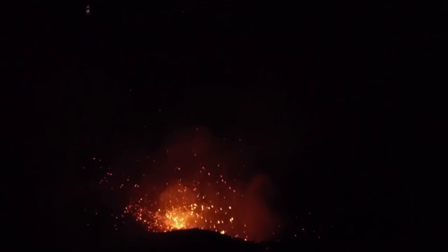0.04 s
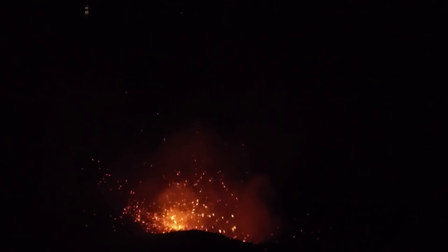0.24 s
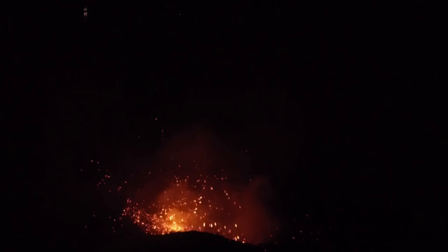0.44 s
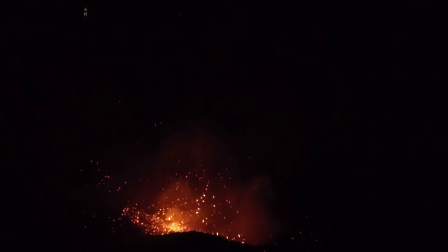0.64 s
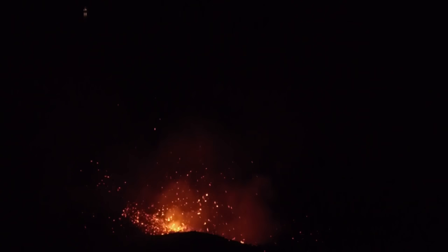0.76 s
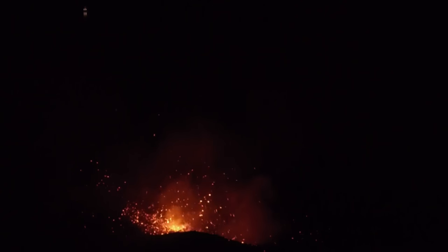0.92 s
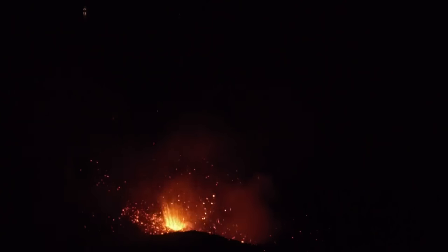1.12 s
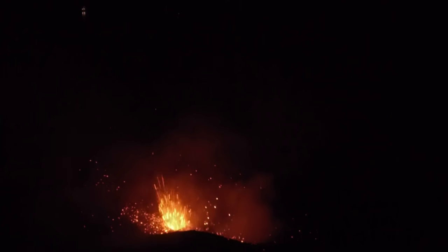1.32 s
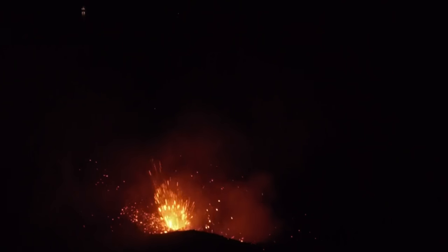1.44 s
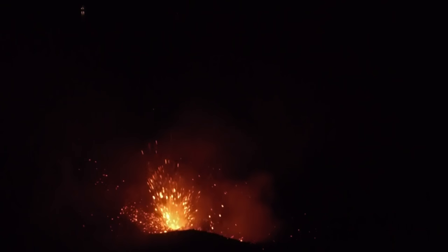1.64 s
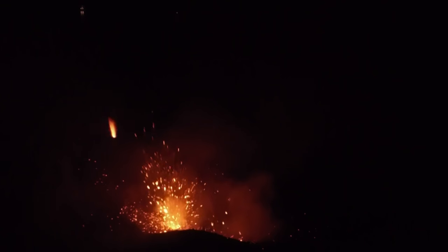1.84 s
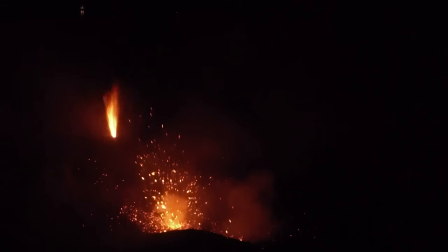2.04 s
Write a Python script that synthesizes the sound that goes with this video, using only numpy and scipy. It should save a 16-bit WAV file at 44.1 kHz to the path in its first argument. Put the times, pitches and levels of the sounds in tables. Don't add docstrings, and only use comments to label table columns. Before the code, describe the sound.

A distant volcanic vent erupting at night, dull uneven thumps and crackling blasts over churning rumble

```python
import sys
import numpy as np
from scipy import signal
from scipy.fft import rfft, irfft
from scipy.io import wavfile
from scipy.ndimage import uniform_filter1d

SR = 44100
rng = np.random.default_rng(int(sys.argv[2]) if len(sys.argv) > 2 else 0)


def natural_amplitude(level_db):
    exponent = np.asarray(level_db, float) / 20
    return 10 ** exponent


def wav_record(signal):
    frames = np.transpose(np.atleast_2d(signal))
    bounded = np.clip(frames, -1, 1)
    quanta = np.round(bounded * 32767).astype(np.int16)
    wavfile.write(sys.argv[1], SR, quanta)


N = 91507
MID_SIDE_SIGNS = np.array([[1], [-1]])


def unit(x):
    return x / np.sqrt(np.mean(x ** 2))


def band(x, hz, width_hz):
    b, a = signal.iirpeak(min(hz, 0.45 * SR), hz / width_hz, fs=SR)
    return signal.lfilter(b, a, x)


def narrow_band(x, hz, first_width_hz, second_width_hz):
    return band(band(x, hz, first_width_hz), hz, second_width_hz)


def colour(x, table):
    hz = np.fft.rfftfreq(N, 1 / SR) + 1
    point_hz, point_db = np.array(table).T
    gain = natural_amplitude(np.interp(np.log(hz), np.log(point_hz), point_db))
    return irfft(rfft(x) * gain, N)


def curve(table):
    return np.interp(np.arange(N) / SR, *np.array(table).T)


def walk(count):
    hold = int(SR / count)
    steps = np.repeat(rng.standard_normal(N // hold + 1), hold)
    return 1.3 * uniform_filter1d(uniform_filter1d(steps, hold), hold)[:N]


def pan(db):
    gains = natural_amplitude(np.array([[db], [-db]]) / 2)
    return gains / gains.mean()


def add(out, s, x):
    i = int(s * SR)
    x = x[..., max(-i, 0):N - i]
    start = max(i, 0)
    out[:, start:start + x.shape[-1]] += x


PORT_FLIP_HZ, PORT_WIDTH_HZ = 990, 2870
PORT_ALIKE = 0.67


def ports(a, b):
    turned = a - 2 * band(a, PORT_FLIP_HZ, PORT_WIDTH_HZ)
    right = PORT_ALIKE * turned + np.sqrt(1 - PORT_ALIKE ** 2) * b
    return np.array([a, right])


# (frequency [Hz], level [dB per Hz])
AIR_SPECTRUM = [(600, 1), (1200, -0.5), (2200, -8.5), (4900, -11), (5600, -15), (8300, -17), (10000, -16),
                (15500, -30)]
# (time [s], level [dB])
AIR_LEVEL = [(0.0, -65.5), (0.39, -66), (0.6, -63), (0.82, -63.5), (0.97, -67.5), (1.19, -68.5),
             (1.37, -64.5), (1.68, -70.5), (2.07, -70.5)]
AIR_DB, AIR_SIDE_DB, AIR_PAN_DB = 9, -3.5, 0


def air():
    mid, side = colour(rng.standard_normal((2, N)), AIR_SPECTRUM)
    db = curve(AIR_LEVEL) + AIR_DB + 0.42 * walk(count=20)
    stereo = unit(mid + natural_amplitude(AIR_SIDE_DB) * side * MID_SIDE_SIGNS)
    return stereo * pan(AIR_PAN_DB) * natural_amplitude(db)


# (time [s], level [dB])
VENT_ACTIVITY = [(0.0, -18.5), (0.12, -16.5), (0.26, -23.5), (0.4, -27), (0.62, -27.5), (.75, -26),
                 (.87, -30.5), (1.13, -22), (1.35, -27), (1.5, -25.5), (1.7, -22.5), (2.07, -22)]
# (frequency [Hz], level [dB per Hz])
RUMBLE_SPECTRUM = [(30, -43.5), (45, -27), (65, -21), (110, -3.5), (220, 2.5), (450, -8), (900, -41.5),
                   (4000, -91.5)]
POPS_PER_S, POP_SPREAD_DB, POP_S = 300, 4, 0.045
RUMBLE_DB, RUMBLE_PAN_DB = 1, 10


def rumble():
    happens = rng.random((2, N)) < POPS_PER_S / SR
    hits = happens * natural_amplitude(POP_SPREAD_DB * rng.exponential(size=(2, N)))
    envelope = signal.lfilter([1], [1, -np.exp(-1 / (POP_S * SR))], hits)
    pops = envelope * rng.standard_normal((2, N))
    stereo = unit(ports(*colour(pops, RUMBLE_SPECTRUM)))
    return stereo * pan(RUMBLE_PAN_DB) * natural_amplitude(curve(VENT_ACTIVITY) + RUMBLE_DB)


# (level [dB], centre frequency [Hz], width [Hz])
GAS_JETS = [
    (-59, 2600, 3200),
    (-56, 950, 90),
    (-69, 4800, 900),
    (-52, 1210, 90),
    (-69, 6000, 7000),
    (-50, 2300, 2100),
    (-56, 1060, 90),
    (-63, 4100, 1700),
]
# (start [s], length [s])
JET_TIMES = [(-.08, .19), (.495, .04), (.5, .17), (.768, .04), (.88, .095), (1.715, .14), (.742, .025),
             (1.77, .095)]
JET_RISE_SHARE, JET_FALL_S = 0.3, 0.007


def hisses():
    out, t = np.zeros((2, N)), np.arange(N) / SR
    for (s, length), (db, hz, width_hz) in zip(JET_TIMES, GAS_JETS):
        rise = np.clip((t - s) / (JET_RISE_SHARE * length), 0, 1)
        fall = np.exp(-np.maximum(t - s - length, 0) / JET_FALL_S)
        edges_hz = [hz - width_hz / 2, hz + width_hz / 2]
        jet_filter = signal.butter(4, edges_hz, "band", fs=SR, output="sos")
        mid, side = signal.sosfilt(jet_filter, rng.standard_normal((2, N)))
        stereo = unit(mid + 0.26 * side * MID_SIDE_SIGNS)
        out += stereo * rise * fall * natural_amplitude(db + 1.2 * walk(count=50))
    return out


# (time [s], peak level [dB], centre frequency [Hz], fall
# time [s])
RUSTLES_AND_TICK = [(0.0674, -46, 11940, 0.001), (0.073, -55, 12500, .001), (.083, -56, 12350, .001),
                    (0.8942, -42, 4500, 0.0056), (.901, -47, 6930, 0.0058), (0.9123, -45, 5400, 0.0022),
                    (0.9299, -38.5, 4500, 0.0014), (0.9288, -41, 1590, 0.0044), (0.9292, -53.5, 8950, .0015),
                    (.941, -43, 4000, 0.0085), (0.9428, -44, 1280, .004), (0.9452, -46.5, 5500, 0.0057),
                    (0.9609, -43.5, 4800, 0.0016), (0.964, -48.5, 5850, 0.0067), (1.912, -49.5, 14100, .0008)]
RUSTLE_RISE_S, RUSTLE_WIDTH_SHARE, RUSTLE_PAN_DB = 0.0012, 1, 11.5


def rustles():
    out, t = np.zeros((2, N)), np.arange(1200) / SR
    for s, db, hz, fall_s in RUSTLES_AND_TICK:
        envelope = np.exp(-t / fall_s) * np.minimum(t / RUSTLE_RISE_S, 1)
        width_hz = RUSTLE_WIDTH_SHARE * min(hz, 5000)
        scrape = narrow_band(rng.standard_normal(len(t)) * envelope, hz, width_hz, width_hz)
        add(out, s, scrape / abs(scrape).max() * pan(RUSTLE_PAN_DB) * natural_amplitude(db))
    return out


# (time [s], level [dB])
BAT_CALLS = [
    (.377, -60.5),
    (.868, -62),
    (1.350, -57),
    (1.823, -66.5),
]
BAT_START_HZ, BAT_END_HZ, BAT_S, BAT_BEND = 11500, 9400, 0.015, 1.8


def bat():
    out = np.zeros((2, N))
    progress = np.arange(int(BAT_S * SR)) / (BAT_S * SR)
    hz = BAT_END_HZ + (BAT_START_HZ - BAT_END_HZ) * (1 - progress) ** BAT_BEND
    whistle = np.sin(2 * np.pi * np.cumsum(hz) / SR)
    envelope = np.sin(np.pi * progress ** 1.3) ** 0.8
    for s, db in BAT_CALLS:
        add(out, s, whistle * envelope * natural_amplitude(db))
    return out


# (time [s], peak level [dB], pitch [Hz], left-right difference [dB])
SHARP_CRACKS = [(0.03, -23.5, 1107, 12.5), (0.069, -27.5, 1300, 2.5), (0.12, -15.5, 982, 20.5),
                (.1195, -30, 1806, -5.5), (0.2619, -17.5, 706, 12.5), (0.305, -31, 770, -1),
                (.349, -21, 533, 9.5), (.719, -23, 2110, 4), (.990, -11.5, 1136, -3.5),
                (1.009, -25, 1300, -1), (1.0195, -22, 1190, 7), (1.238, -22.5, 2080, -1),
                (1.417, -27.5, 800, 8.5), (1.44, -28, 895, 0), (1.488, -30, 814, -1),
                (1.765, -20, 993, 9.5), (1.8686, -12.5, 558, 10.5), (1.8718, -5, 818, 20.5),
                (1.9162, -5, 517, 17), (1.923, -17, 1370, 5)]
CRACK_CYCLES, CRACK_EDGE = 0.4, 1.5
CRACK_TAIL_DB, CRACK_TAIL_S = -22, 0.003


def cracks():
    out, t = np.zeros((2, N)), np.arange(-200, 1000) / SR
    for s, db, hz, pan_db in SHARP_CRACKS:
        envelope = np.exp(-(abs(t * hz) / CRACK_CYCLES) ** CRACK_EDGE)
        spike = -envelope * np.cos(2 * np.pi * hz * t)
        noise = unit(narrow_band(rng.standard_normal(len(t)), hz, hz, hz))
        onset = np.clip(t * hz, 0, 1) ** 2
        tail = noise * np.exp(-abs(t) / CRACK_TAIL_S) * onset
        crack = spike + natural_amplitude(CRACK_TAIL_DB) * tail
        add(out, s + t[0], ports(crack, -crack) * pan(pan_db) * natural_amplitude(db))
    return out


# (time of peak [s], peak level
# [dB], pitch [Hz], left-right difference [dB])
GAS_BLASTS = [(0.034, -8, 345, 11.5), (0.044, -15, 346, 30), (0.052, -15.5, 335, 13.5),
              (0.068, -4.5, 322, 8.5), (0.081, -9, 258, 15), (0.091, -9.5, 406, 0.5),
              (0.103, -6.5, 352, 26.5), (0.12, -0.5, 301, 5), (0.15, -11.5, 245, 8),
              (0.173, -5.5, 330, 9.5), (0.266, 0.5, 219, 7), (0.298, -10, 186, 4.5),
              (0.307, -7, 311, 16.5), (0.334, -12, 242.6, 11), (0.498, -6.5, 274, 11),
              (0.555, -14.5, 228, -5), (0.575, -12.5, 279, 4), (0.681, -17.5, 228, -12),
              (0.714, -15, 245, 9), (0.724, -6, 290, 1.5), (0.749, -22, 233, -4),
              (0.757, -9.5, 179, 16.5), (0.804, -12.5, 187, -2), (0.815, -35, 191, -7),
              (0.824, -10.5, 203, 10), (0.973, -8, 223, -2), (0.983, -10, 334, 27),
              (0.991, -6, 274, 16.5), (1.007, -3, 222, 11),
              (1.019, -5.5, 393, 14), (1.093, -4, 290, -3), (1.102, -9, 320, -8), (1.143, -11, 201, -7),
               (1.155, -9.5, 240, 11.5), (1.167, -11.5, 277, 4.5), (1.207, -11, 230, 3),
               (1.258, -13, 285, 3.5), (1.44, -3, 266, 10.5), (1.451, -12, 309, 14.5),
               (1.476, -9.5, 219.4, 27), (1.491, -4, 303, 9), (1.527, -9.5, 244, 8.5),
               (1.583, -26, 226, -6.5), (1.591, -6, 288, 1.5), (1.625, -1, 316, 3), (1.657, -4, 267, 8.5),
               (1.673, -7, 249, 39.5), (1.692, -8.5, 363, 7.5), (1.729, -3.5, 390, 17),
               (1.736, -7.5, 422, 7), (1.747, -11, 326, 3), (1.766, -11.5, 259, 26), (1.825, -12, 509, 7.5),
               (1.872, -5, 286, 14), (1.892, -7, 303, -1), (1.917, 0.9, 364, 6), (1.942, -8, 361, 18.5),
               (2.008, -13.5, 291, 36),
              (.001, -4.5, 185, 12),
    (.351, -16.5, 400, 1.5),
    (0.415, -23, 409, 5),
    (0.469, -16, 390, -1.5),
    (0.789, -21, 394, 16),
    (1.11, -5.5, 239, -4),
    (1.619, -3, 260, 11),
    (1.921, -6, 338, -2),
    (1.968, -14.5, 445, 37),
    (2.065, -11, 316, 3),
              (0.01, -16, 228, 10.5), (0.023, -8, 215, 16), (0.11, -19.5, 317, 18.5), (0.134, -14, 336, 10),
              (0.163, -6.5, 288, 10), (0.187, -15, 358, 20), (0.196, -20.5, 248, 6), (0.236, -11.5, 194, 5),
              (0.275, -18.5, 273, 24), (0.285, -24, 208, -3), (0.322, -18, 226, -11), (0.438, -15, 240, 17),
              (0.483, -8, 242, 6.5), (0.51, -13.5, 214, 19), (0.692, -17, 236, 10), (0.703, -24, 248, 12),
              (0.732, -10.5, 300, 13), (0.764, -18, 240, 1), (0.773, -17, 257, 5), (0.815, -20, 187, 0.5),
              (0.875, -21, 227, -7), (0.905, -15, 203, 7), (1.028, -14.5, 299, 16), (1.042, -16, 309, 19),
              (1.063, -12.5, 248, 4), (1.073, -27, 285, 6.5), (1.082, -14.5, 194, 5),
              (1.117, -19.5, 208, 1), (1.22, -14.5, 197, 0.5), (1.236, -13.5, 250, 12),
              (1.282, -11.5, 217, 1), (1.339, -20, 208.6, 4.5), (1.418, -18, 231.5, 21),
              (1.5, -21.5, 290, 8), (1.553, -13, 289, 11.5), (1.568, -23.5, 328, 24), (1.599, -27, 203, 17),
              (1.611, -16, 183, 1.5), (1.632, -20.5, 319, 19.5), (1.641, -33, 292, 1.5),
              (1.682, -15, 289, 29.5), (1.791, -13, 262, 19.5), (1.848, -5.5, 229, 13),
              (1.882, -8.5, 201, 17), (1.908, -15, 274, -8), (1.981, -6, 348, 2), (2.021, -15.5, 238, 12.5),
              (2.032, -21.5, 275, 26)]
BLAST_RISE_CYCLES, BLAST_FALL_CYCLES, BLAST_GLIDE, BLAST_DB = 0.59, 0.75, 0.15, -2
BLAST_LOW_HZ = 74
GRIT_DB, GRIT_HZ, GRIT_WIDTH_HZ, GRIT_FALL_S = -17.5, 545, 207, 0.0046


def blasts():
    out, t = np.zeros((2, N)), np.arange(-800, 1600) / SR
    rows = GAS_BLASTS
    noise = rng.standard_normal((2, N + len(t)))
    grit = unit(narrow_band(noise, GRIT_HZ, GRIT_WIDTH_HZ, 2 * GRIT_WIDTH_HZ))
    grit = signal.sosfilt(signal.butter(4, 1300, fs=SR, output="sos"), grit)
    turns = rng.standard_normal((len(rows), 2)) * [0.3, 1]
    for (s, db, hz, pan_db), turn in zip(rows, turns):
        cycles = t * hz
        width = np.where(cycles < 0, BLAST_RISE_CYCLES, BLAST_FALL_CYCLES)
        envelope = np.exp(-(cycles / width) ** 2)
        phase = 2 * np.pi * cycles * (1 - BLAST_GLIDE * np.tanh(cycles))
        swing = -envelope * np.cos(phase + turn[:, None])
        start = int(s * SR)
        rough = grit[:, start:start + len(t)] * np.exp(-abs(t) / GRIT_FALL_S)
        rough = rough * natural_amplitude(GRIT_DB) * (hz / 280) ** 2
        add(out, s + t[0], ports(*(swing + rough)) * pan(pan_db) * natural_amplitude(db + BLAST_DB))
    return signal.sosfiltfilt(signal.butter(2, BLAST_LOW_HZ, "high", fs=SR, output="sos"), out)


SLOPE_ECHO_S, SLOPE_ECHO_DB = 0.028, -14


def slope_echo(vent):
    t = np.arange(int(0.25 * SR)) / SR
    scatter = rng.standard_normal((2, len(t))) * np.exp(-t / SLOPE_ECHO_S)
    scatter = scatter / np.sqrt((scatter[0] ** 2).sum())
    return natural_amplitude(SLOPE_ECHO_DB) * signal.fftconvolve(vent, scatter, axes=1)[:, :N]


def scene():
    vent = blasts() + cracks()
    far = vent + slope_echo(vent) + rumble()
    return far + rustles() + hisses() + bat() + air()


def roll_off(x):
    return signal.sosfilt(signal.butter(12, 15830, fs=SR, output="sos"), x)


BASS_CUT_HZ = 63.5


def record(dry):
    x = signal.sosfilt(signal.butter(3, BASS_CUT_HZ, "high", fs=SR, output="sos"), dry)
    return roll_off(np.clip(x, -1, 1))


dry = scene()
out = record(dry)
wav_record(out)
```